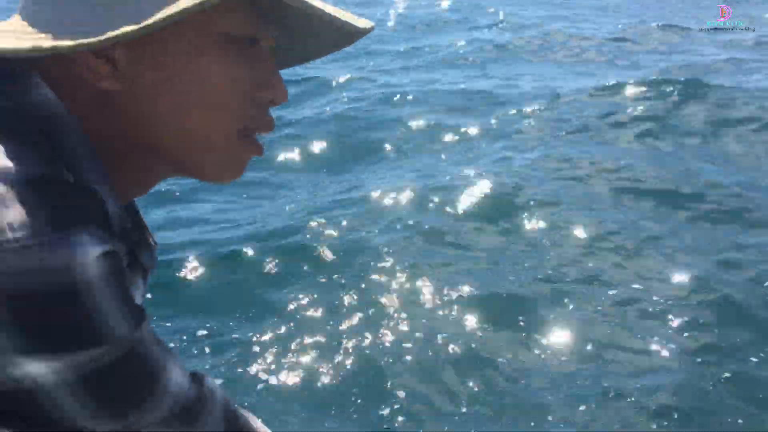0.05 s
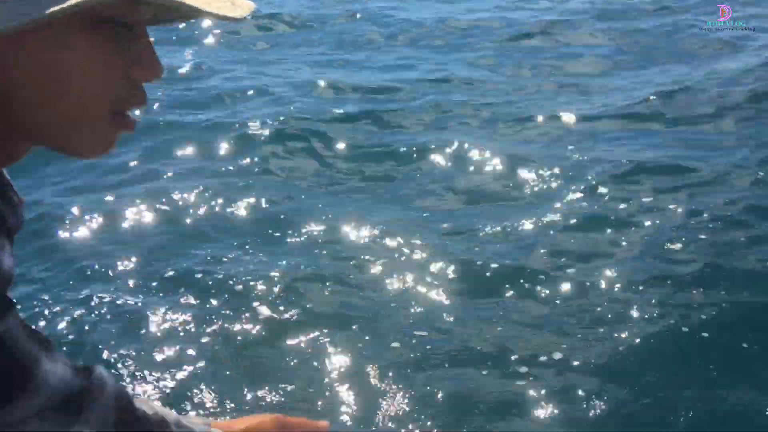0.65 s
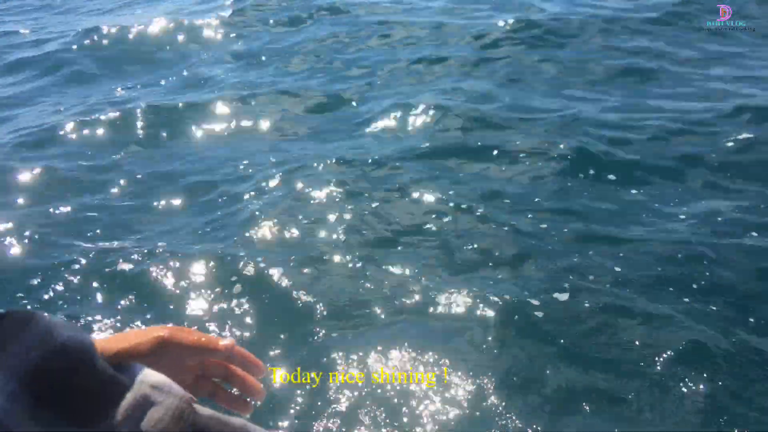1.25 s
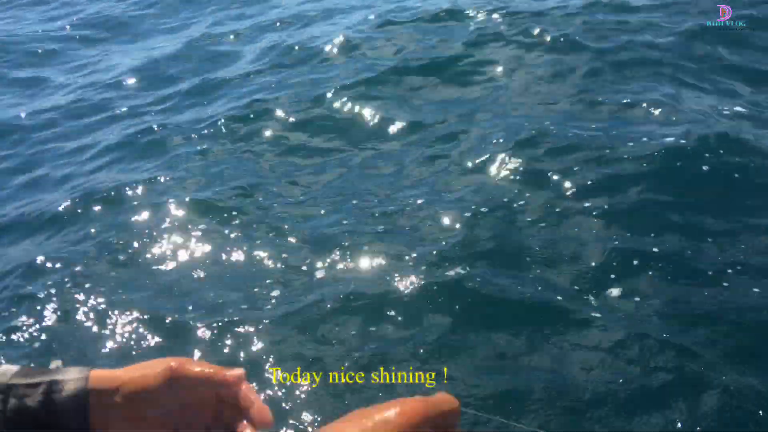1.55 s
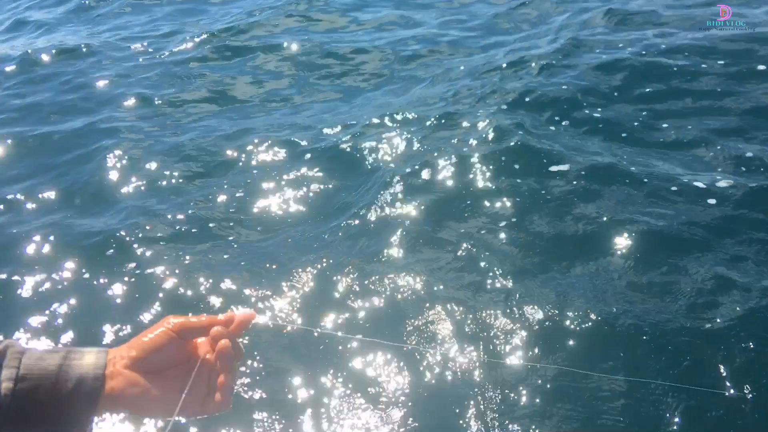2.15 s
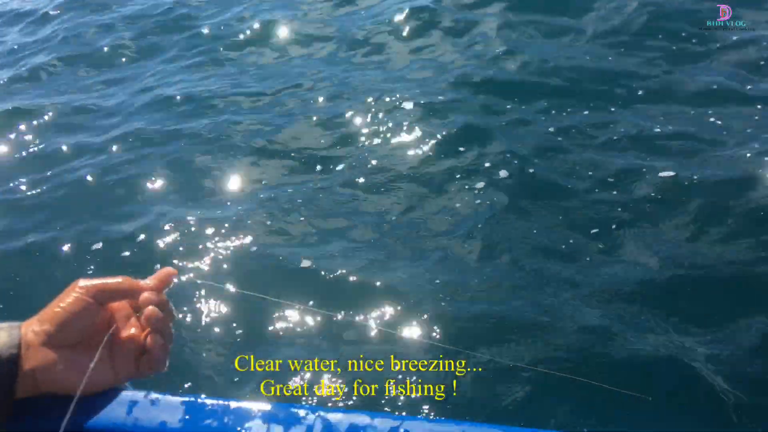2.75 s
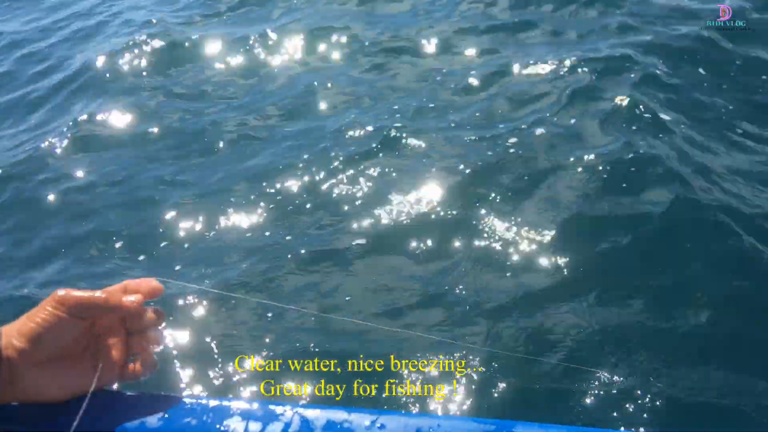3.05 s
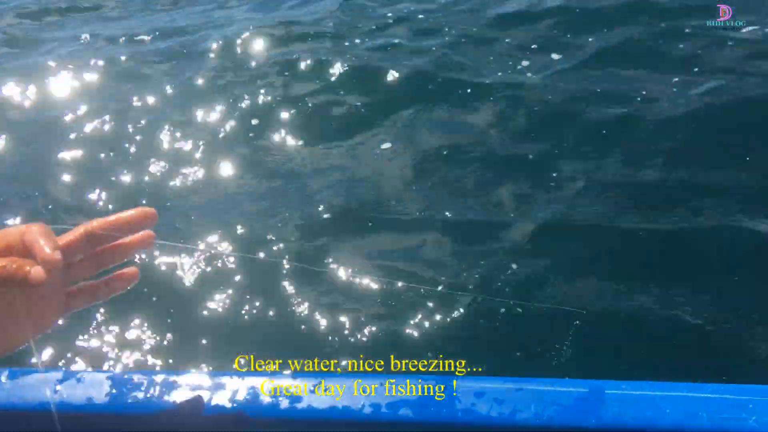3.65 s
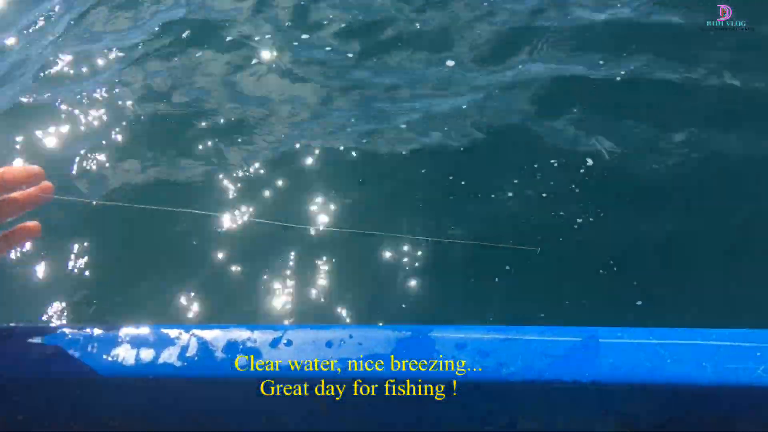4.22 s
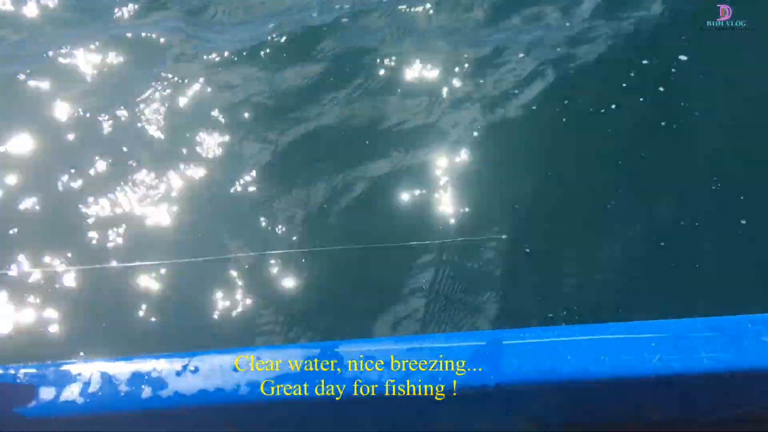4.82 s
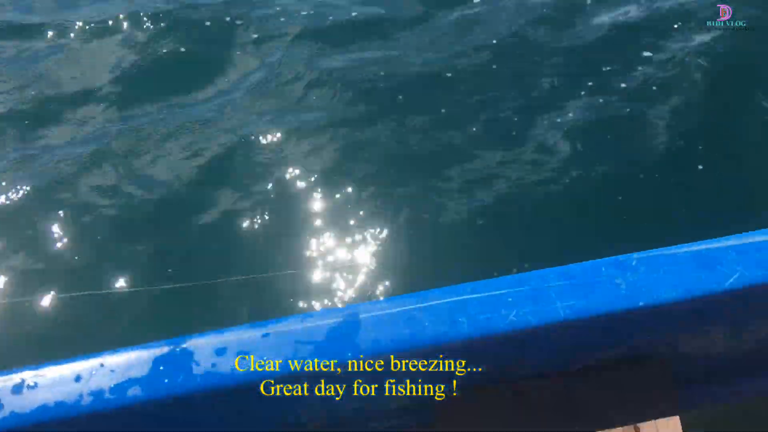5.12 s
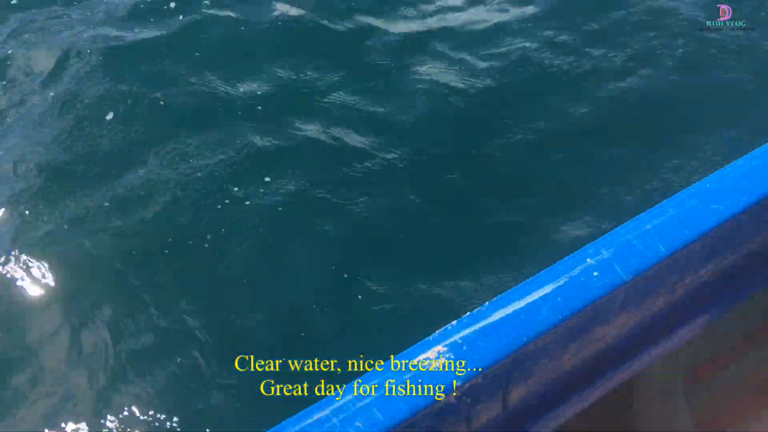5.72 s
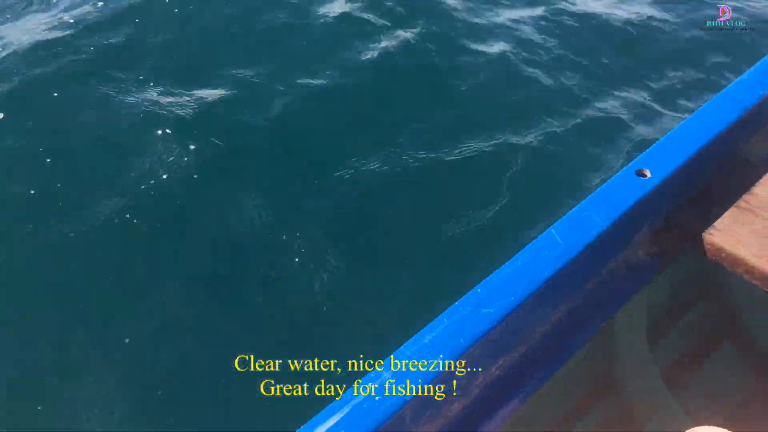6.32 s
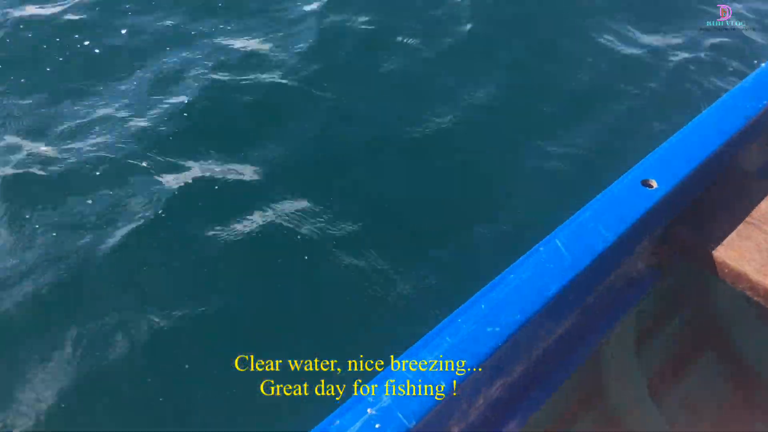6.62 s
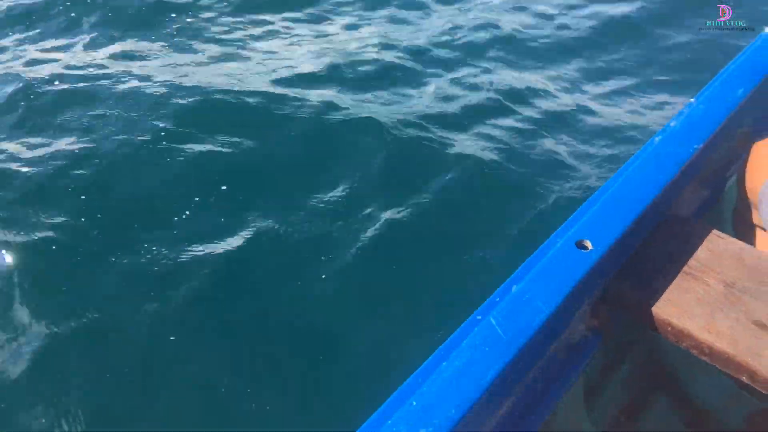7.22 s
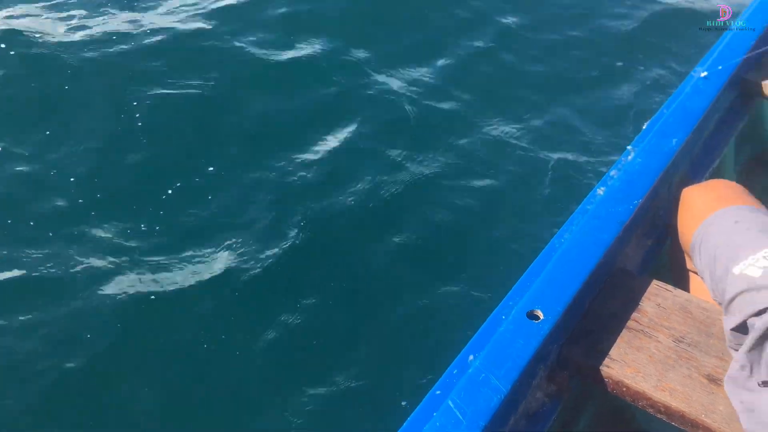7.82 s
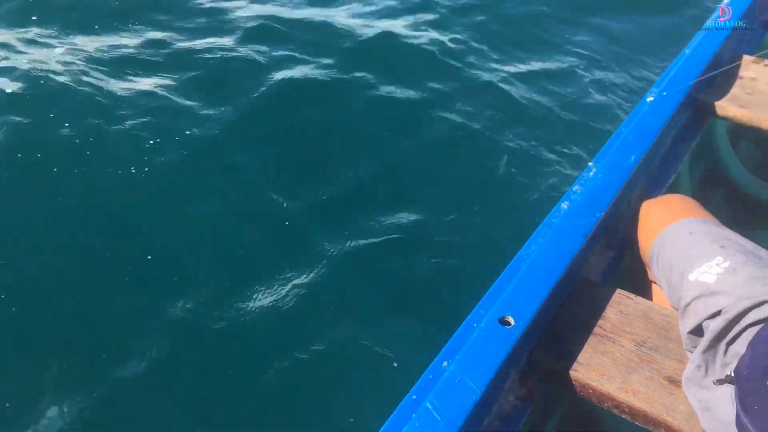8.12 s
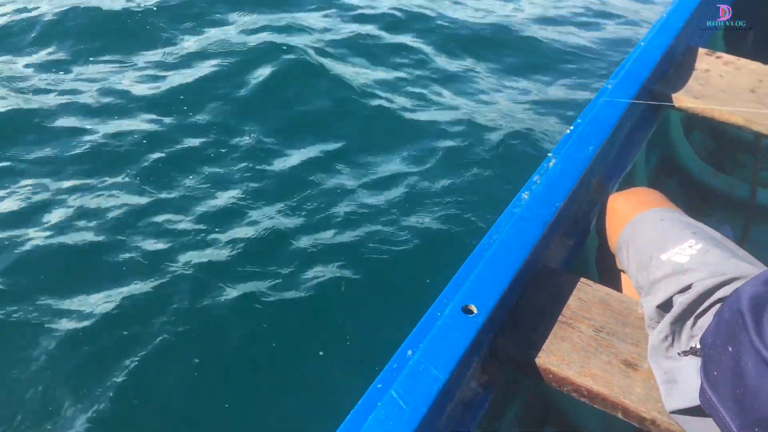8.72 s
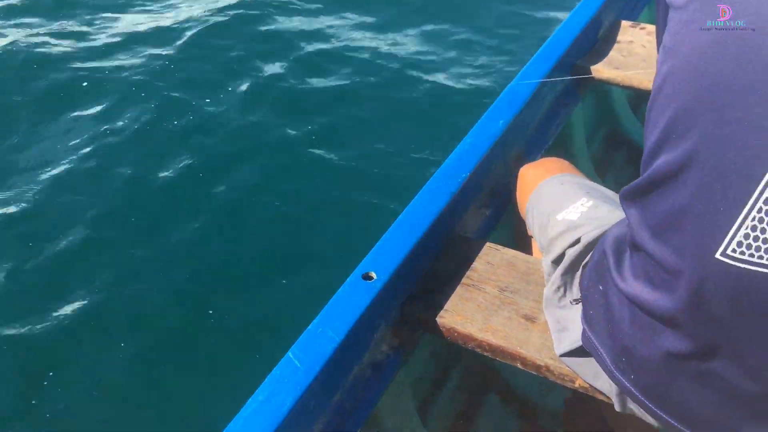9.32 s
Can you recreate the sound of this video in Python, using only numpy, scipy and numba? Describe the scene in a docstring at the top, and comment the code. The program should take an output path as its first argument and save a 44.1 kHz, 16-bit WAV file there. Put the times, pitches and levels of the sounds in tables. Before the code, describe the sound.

Choppy water gurgles and thumps against a wooden boat over a slowly idling engine and low wind rumble.

```python
"""A one-cylinder engine thuds slowly at idle, over rippling water and wind rumbling on a microphone.
It sits in a small wooden boat on a choppy sea. Wavelets lap at the side, trapping air that gulps
and plinks; foam fizzes, drops tick and clothing rustles twice. Later a few waves slap the planks
with a hollow thump, and the hardest slaps overload the microphone."""
import sys
import numpy as np
from scipy import signal
from scipy.fft import rfft, irfft, next_fast_len
from scipy.io import wavfile
from scipy.ndimage import uniform_filter1d
from numba import njit

SR = 44100
rng = np.random.default_rng(int(sys.argv[2]) if len(sys.argv) > 2 else 0)


def wav_out(sig):
    """Save sig, one row per channel (or a flat mono array), as 16-bit PCM at SR to the path in sys.argv[1]."""
    wavfile.write(sys.argv[1], SR, np.round(np.clip(np.atleast_2d(sig).T, -1, 1) * 32767).astype(np.int16))


N = 417186
TIME = np.arange(N) / SR
SHORT = TIME[:SR * 2 // 5]  # 0.4 s, the room for one short sound


def undb(db):
    """Turn decibels into a number to multiply by."""
    return 10 ** (np.asarray(db) / 20)


def curve(rows):
    """A volume that glides through rows of start_s, level_db."""
    return undb(np.interp(TIME, *np.transpose(rows)))


def add(out, start_s, sound):
    """Mix a sound in at a given time."""
    i = int(np.clip(start_s * SR, 0, N))
    out[i:i + len(sound)] += sound[:N - i]


def colour(x, points):
    """Shape the bass and treble of a sound by rows of pitch_hz, level_db."""
    size = next_fast_len(len(x))
    hz, db = np.transpose(points)
    bins_hz = np.maximum(np.arange(size // 2 + 1) * SR / size, .5)
    gain = undb(np.interp(np.log(bins_hz), np.log(hz), db))
    return irfft(rfft(x, size) * gain, size)[:len(x)]


def unit(x):
    """Scale a sound to an average strength of 1."""
    return x / np.std(x)


def burst(x):
    """Scale a sound so that its loudest 8 ms have a strength of 1."""
    return x / np.sqrt(uniform_filter1d(x * x, 350).max())


def wander(rate_hz):
    """A smooth random drift, about 1 either way."""
    hold = int(SR / rate_hz)
    steps = np.repeat(rng.standard_normal(N // hold + 1), hold)
    return unit(uniform_filter1d(steps, hold)[:N])


def fade(fade_s):
    """Die away by 60 dB in fade_s seconds."""
    return np.exp(-np.log(1000) * SHORT / fade_s)


def fade_in(rise_s):
    """Rise from silence, most of the way within rise_s seconds."""
    return 1 - np.exp(-SHORT / rise_s)


def ring(hz, fade_s):
    """One dying tone of a struck object."""
    return np.sin(2 * np.pi * hz * SHORT) * fade(fade_s)


def reflect(x, echo_db=0.5):
    """Water and planks throw a sound back and forth for a moment."""
    echoes = (rng.standard_normal(len(SHORT)) * fade(0.13) * fade_in(0.00037))[:SR // 8]
    return x + undb(echo_db) * signal.fftconvolve(x, echoes / np.linalg.norm(echoes))[:len(x)]


def wind():
    """Swirls of air push slowly on the microphone, harder in each gust."""
    # strength of the wind: start_s, level_db
    gusts = [(0.0, -28.5), (1.42, -24), (1.66, -22.5), (2.1, -25), (2.5, -27.5), (2.98, -14), (3.16, -18.5),
             (3.86, -19), (4.78, -27), (5.12, -17.5), (5.3, -23), (5.56, -13), (5.78, -13), (7.18, -21.5),
             (7.32, -25.5), (7.46, -22), (8.58, -20.5), (8.86, -16.5), (9.44, -13)]
    # tone of its rumble: pitch_hz, level_db
    rumble_tone = [(1, -28), (4, 1), (10, -8), (20, -11.5), (40, -21.5), (80, -27.5), (160, -45.5),
                   (400, -54.5), (2000, -99)]
    return undb(5.5) * curve(gusts) * unit(colour(rng.standard_normal(N), rumble_tone))


@njit
def bubbles(starts_s, hz, cycles, sizes, rise, samples):
    """Air bubbles ring and die away, climbing in pitch as they near the surface."""
    out = np.zeros(samples)
    for k in range(len(starts_s)):
        first, life, phase = int(starts_s[k] * SR), cycles[k] / hz[k] * SR, 0.
        for i in range(min(int(life), samples - first)):
            phase += 2 * np.pi * min(hz[k] * (1 + rise * i / life), .45 * SR) / SR
            swell = 1 - np.exp(-(phase / 4) ** 2)
            out[first + i] += sizes[k] * np.exp(-6.9 * i / life) * swell * np.sin(phase)
    return out


def patter(low_hz, high_hz, cycles, scatter_db, count):
    """Bubbles at random moments: many faint, a few strong."""
    when, pitch, size = rng.random((count, 3)).T
    hz = low_hz * (high_hz / low_hz) ** pitch
    sizes = undb(-scatter_db * np.log(np.maximum(size, .04))) * hz
    ringing = bubbles(when * N / SR, hz, np.full(count, cycles), sizes, rise=0.098, samples=N)
    return unit(reflect(ringing))


def splashlets(count):
    """Tiny crests collapse at random, each a short puff of hiss."""
    power = np.zeros(N)
    for when, size in rng.random((count, 2)):
        add(power, when * N / SR, undb(14 * size ** 3) ** 2 * fade(.045) * fade_in(.002))
    return unit(np.sqrt(power) * rng.standard_normal(N))


def ripples():
    """Ripples burble and splash in little groups over a faint wash."""
    # ripples around the boat: start_s, level_db
    levels = [(0.0, -39.5), (0.22, -34), (0.56, -40), (0.98, -44.5), (1.25, -38), (1.65, -41), (3.2, -42.5),
              (3.62, -37.5), (4.2, -42), (4.42, -36.5), (5.5, -45.5), (6.32, -46.5), (6.92, -41.5),
              (7.18, -38), (7.8, -39), (8.04, -31), (8.2, -42), (8.64, -37), (9.2, -48.5), (9.44, -41)]
    # tone of the water: pitch_hz, level_db
    water_tone = [(80, -20), (200, 11.5), (400, 7.5), (700, 4.5), (1000, -3), (1700, -8.5), (2600, -20),
                  (4000, -25), (7000, -39.5), (15000, -44.5)]
    groups = undb(2.1 * wander(rate_hz=12))
    burble = patter(260., 3600., cycles=20., scatter_db=2.9, count=2400)
    spatter = patter(2800., 14000., cycles=28., scatter_db=4.5, count=2200)
    lively = undb(-7) * burble + undb(-3) * spatter + undb(-12) * splashlets(count=160)
    wash = undb(-9.5) * rng.standard_normal(N)
    return undb(3.5) * curve(levels) * unit(colour(groups * lively + wash, water_tone))


def high_hiss():
    """High hiss and crackle: foam fizz, swelling twice with the rustle of clothing."""
    # strength of the hiss: start_s, level_db
    levels = [(0.0, -51.5), (0.6, -60), (1.28, -58), (1.56, -65.5), (2.3, -58), (2.46, -49.5), (3.2, -65.5),
              (4.12, -64.5), (4.48, -60), (5.42, -71), (6.38, -63), (6.66, -55.5), (7.0, -63.5),
              (8.06, -61.5), (9.04, -65.5), (9.18, -52), (9.44, -72)]
    # tone of the hiss: pitch_hz, level_db
    hiss_tone = [(500, 14.5), (2000, 13.5), (3500, 6), (5500, 0.5), (8500, -2), (11000, -8.5), (15500, -17)]
    crackle = .95 * patter(1830., 16000., cycles=16., scatter_db=4.8, count=2200)
    hiss = unit(colour(rng.standard_normal(N) + crackle, hiss_tone))
    return undb(5.5) * curve(levels) * hiss


def engine(idle_hz=10.165, first_firing_s=.0316):
    """Firing and exhaust thud, with lighter valve taps between; every stroke clacks the metal block."""
    # strokes of one cycle, timed from the firing: delay_s, pitch_hz, fade_s, thud_db, clack_db
    strokes = [(0, 98.8, 0.028, -8, -21.5), (0.028, 122.7, 0.22, -21.5, -23.5),
               (0.056, 102.6, 0.08, -21, -26.5), (0.088, 142, 0.078, -31, -28)]
    # tones of the engine block and mounts: pitch_hz, level_db, fade_s
    block_tones = [(175.6, 2.5, 0.089), (248.6, -14.5, 0.38), (380.5, -6, 0.093), (442.4, 3, 0.071),
                   (598, -2.5, 0.049)]
    out = np.zeros(N)
    block = np.array([undb(db) * ring(hz, fade_s) for hz, db, fade_s in block_tones])
    cycle_count = int(N / SR * idle_hz) + 1
    for delay_s, hz, fade_s, thud_db, clack_db in strokes:
        thud = -undb(thud_db) * ring(hz, fade_s) * fade_in(.002)
        for cycle, chance in enumerate(rng.standard_normal((cycle_count, len(block) + 2))):
            start_s = first_firing_s + cycle / idle_hz + delay_s + 0.00037 * chance[0]
            strength = undb(1.3 * chance[1])
            clack = -(1 + 0.89 * chance[2:]) @ block / 5
            clatter = undb(-35) * rng.standard_normal(len(SHORT)) * fade(0.14)
            add(out, start_s, strength * (thud + undb(clack_db) * (clack + clatter)))
    return signal.sosfilt(signal.butter(1, 4500, fs=SR, output="sos"), out)  # soften the treble


def cloud(hz, octaves, spread_s, cycles, count, rise=0.074, echo_db=2.0):
    """A handful of bubbles around one pitch swells and thins out; small, high ones are fainter."""
    pitch, size, life = rng.standard_normal((count, 3)).T
    starts_s = spread_s * rng.exponential(size=(count, 2)).mean(axis=1)
    starts_s -= starts_s.min()
    swell = (.3 + starts_s / spread_s) * np.exp(-starts_s / spread_s)
    sizes = undb(2.33 * size - 8.7 * octaves * pitch) * swell
    pitches_hz = hz * 2 ** (octaves * pitch)
    ringing = bubbles(starts_s, pitches_hz, cycles * np.exp(0.23 * life), sizes, rise, len(SHORT))
    return burst(reflect(ringing, echo_db))


def plinks():
    """Small bubbles ring out, bending upward, with a tiny splash as they pinch off."""
    # small bubbles: start_s, level_db, pitch_hz
    events = [(0.088, -38, 1900), (0.159, -26, 1720), (0.2484, -27.5, 1406), (0.374, -24.5, 1480),
              (0.666, -24.5, 1475), (0.835, -27, 955), (0.934, -37, 2800), (0.962, -38, 2220),
              (1.104, -32.5, 3430), (1.264, -31, 1720), (1.696, -32, 1100), (1.904, -32, 1320),
              (2.006, -31.5, 2160), (2.055, -23.5, 1105), (2.152, -40, 2380), (2.456, -28, 1560),
              (2.5462, -27, 1720), (2.78, -36, 2180), (3.058, -27.5, 1610), (3.072, -41, 3150),
              (3.275, -37, 2070), (3.288, -30.5, 1180), (3.331, -33.5, 1890), (3.612, -21.5, 1433),
              (3.891, -30.5, 1900), (4.343, -27.5, 1865), (4.419, -29, 1540), (4.486, -27, 1386),
              (4.525, -26, 1996), (4.618, -30, 994), (4.681, -28, 1825), (4.761, -23, 1270),
              (4.8487, -29, 2280), (4.993, -34, 2640), (5.088, -22.5, 970), (5.390, -34.5, 2330),
              (5.717, -25, 1825), (5.893, -30.5, 1420), (5.936, -24, 940), (6.086, -29, 985),
              (6.448, -29, 1593), (6.522, -22, 1420), (7.165, -23, 1100), (7.447, -24, 1070),
              (7.489, -28, 1020), (7.736, -34, 1800), (8.21, -27.5, 1290), (8.314, -30, 1720),
              (8.347, -20, 1290), (8.404, -34, 1943), (8.609, -37, 2760), (8.809, -37, 3100),
              (8.884, -26.5, 1280), (9.104, -28, 1695), (9.165, -22, 985)]
    out = np.zeros(N)
    for start_s, db, hz in events:
        plink = cloud(hz, octaves=.075, spread_s=.003, cycles=37., count=3, rise=.14, echo_db=-4.5)
        splash = undb(-8) * cloud(hz, octaves=.5, spread_s=.011, cycles=7., count=16)
        add(out, start_s, undb(db - 6.5) * (plink + splash))
    return out


def churn(swell_s):
    """Water torn too fine to ring makes a rush that swells and dies away."""
    tone = [(400, -23), (1500, 9.5), (2500, 9.5), (5000, -8), (15000, -28)]
    rush = colour(rng.standard_normal(len(SHORT)), tone)
    return burst(rush * SHORT * np.exp(-SHORT / swell_s))


def laps():
    """A wavelet folds over a pocket of air, which breaks into a gulp, a slosh and fine spray."""
    # wavelets at the side: start_s, level_db, pocket_pitch_hz, spray_db
    wavelets = [(0.156, -21, 298, -58), (0.188, -18.5, 640, -56), (0.31, -26, 530, -42),
                (0.348, -21, 295, -63), (0.695, -26, 696, -39.5), (0.723, -17, 693, -47.5),
                (0.919, -26, 338, -56), (1.249, -20, 638, -42.5), (1.92, -41, 571, -46),
                (1.99, -27, 587, -40), (2.787, -30, 660, -43), (2.832, -32, 727, -36),
                (2.910, -20, 339, -42.5), (3.087, -23, 309, -70), (3.526, -21.5, 274, -44),
                (3.613, -36, 684, -31.5), (3.637, -15.5, 370, -38.5), (3.661, -28, 735, -62),
                (3.814, -11, 635, -33), (4.04, -26, 748, -46.5), (4.3, -26, 619, -62),
                (4.354, -26, 464, -39), (4.37, -21, 840, -61), (4.732, -19, 445, -49),
                (4.748, -19.5, 597, -40), (4.963, -28, 325, -61), (5.029, -15, 333, -44.5),
                (5.089, -29.5, 602, -54), (5.221, -33, 605, -36), (5.237, -18.5, 745, -42),
                (5.36, -20, 329, -44), (5.649, -21, 303, -41), (5.68, -19, 315, -50),
                (5.928, -25, 320, -45.5), (6.223, -34, 554, -76), (6.527, -19.5, 698, -31.5),
                (6.571, -14.5, 762, -41.5), (7.084, -18, 355, -43), (7.151, -22, 349, -38),
                (7.203, -18.5, 319, -40), (7.228, -25.5, 730, -62), (7.342, -22, 421, -68),
                (7.366, -20, 570, -40), (7.481, -26.5, 640, -38.5), (7.563, -4, 479, -43),
                (7.899, -8.5, 740, -48), (7.958, -29, 603, -45), (8.012, -16.5, 515, -37.5),
                (8.105, -15, 320, -40), (8.133, -15, 587, -49), (8.205, -23, 616, -53),
                (8.258, -24, 280, -57), (8.322, -18.5, 518, -48), (8.501, -17.5, 581, -70),
                (8.687, -26.5, 716, -40), (8.717, -17, 262, -49), (8.885, -16, 295.4, -42.5),
                (9.157, -24, 533, -37.5), (9.188, -17.5, 559, -39.5), (9.389, -18.5, 507, -82)]
    out = np.zeros(N)
    for start_s, db, hz, spray_db in wavelets:
        gulp_db = db - 9.5 - 2.5 * np.log2(hz / 400)  # smaller, higher pockets gulp less
        slosh_db = db + 2 + 0.56 * (spray_db - db)  # grows with both pocket and spray
        pocket = undb(-4) * cloud(hz, .07, .007, 28., count=3, rise=.18, echo_db=-6)
        pocket += undb(-10.5) * cloud(424., .32, .015, 20.5, count=7, rise=.24)
        gulp = cloud(205., .293, .0155, 9.3, count=5)
        slosh = cloud(740., .3, .013, 17., count=12, rise=.16)
        spray = undb(1.5) * cloud(1800., .48, .021, 22., count=18, rise=.13, echo_db=-5)
        spray += undb(-3.5) * churn(swell_s=.007)
        mist = undb(-14.5) * cloud(4540., .655, .019, 22., count=26)
        body = undb(db) * pocket + undb(gulp_db) * gulp + undb(slosh_db) * slosh
        add(out, start_s, body + undb(spray_db) * (spray + mist))
        # thrown water lands again as a second, smaller splash
        landing_s = start_s + .028 * (.5 + rng.random())
        add(out, landing_s, undb(spray_db - 17) * cloud(2516., .62, .004, 22., count=10))
    return out


def drops():
    """A falling drop ticks softly on the surface and leaves a tiny crackle."""
    # drops landing nearby: start_s, level_db
    landings = [(0.156, -23), (0.656, -36), (0.672, -30), (0.919, -31), (1.108, -32), (2.334, -30.5),
                (2.5207, -34), (2.5469, -24), (2.77, -28.5), (3.614, -23), (3.8257, -31), (3.84, -29),
                (3.878, -28.5), (3.8935, -28.5), (4.277, -35), (4.4604, -36), (4.754, -30.5),
                (5.0553, -31.5), (5.2303, -30), (5.2659, -31), (6.087, -28.5), (6.415, -31.5), (6.839, -38),
                (6.922, -36), (7.1523, -37), (7.333, -29.5), (7.678, -38), (7.703, -39), (7.844, -35.5),
                (8.239, -39), (8.357, -30), (8.8456, -34), (8.874, -35)]
    tick_tone = [(800, -15), (3000, 0), (8000, -5), (15000, -14)]
    out = np.zeros(N)
    contact = fade(.012) * fade_in(.001)
    for start_s, db in landings:
        tick = colour(rng.standard_normal(len(SHORT)) * contact, tick_tone)
        crackle = cloud(5000., octaves=.5, spread_s=.01, cycles=30., count=12, echo_db=-4)
        add(out, start_s, undb(db - 18) * (burst(reflect(tick, echo_db=-3)) + crackle))
    return out


def heaves():
    """Big air pockets squeezed under the boat give a dull, low wobble."""
    # waves heaving underneath: start_s, level_db, pitch_hz
    swells = [(0.359, -17.5, 79.5), (4.361, -13.5, 95.4), (7.188, -14, 152), (7.732, -16.5, 139.7)]
    out = np.zeros(N)
    for start_s, db, hz in swells:
        add(out, start_s, undb(db) * cloud(hz, octaves=.22, spread_s=.0287, cycles=4.4, count=5))
    return out


def swishes():
    """Cloth slides over cloth: a bright rustle that swells and stops."""
    # clothing brushing past: start_s, length_s, level_db
    brushes = [(2.318, 0.41, -61), (9.184, 0.13, -41.5)]
    cloth_tone = [(400, -9), (1500, 8), (5000, -2), (9000, -7), (15000, -13)]
    out = np.zeros(N)
    for start_s, length_s, db in brushes:
        swell = np.sin(np.pi * np.clip((TIME - start_s) / length_s, 0, 1))
        out += undb(db) * swell * rng.standard_normal(N)
    return unit(colour(out, cloth_tone)) * np.std(out)


def slaps(thump_hz=285, swell_s=.002):
    """A wave hits the boat flat: trapped air thumps and breaks up, planks ring and water bursts out."""
    # slaps on the planks: start_s, level_db, splash_db
    hits = [(3.8194, -19.5, -3), (7.5497, 2, -2.5), (7.8923, 2, -5), (8.1232, -6, -4), (8.718, -19.5, -1),
            (8.8724, -17.5, -5.5), (9.046, -21.5, -3)]
    # tones of the planks: pitch_hz, level_db, fade_s
    planks = [(95.5, -7, 0.45), (150.1, -7, 0.29), (224, -2.5, 0.1), (262, 3, 0.096), (321.5, -2.5, 0.13),
              (437, -5, 0.071), (728, 2, 0.073)]
    # tone of the bursting spray: pitch_hz, level_db
    splash_tone = [(60, -6), (250, 0), (650, 7.5), (1080, -3.5), (1480, -0.5), (2500, -16.5), (4000, -24),
                   (8000, -37), (15000, -46)]
    out = np.zeros(N)
    swell = SHORT / swell_s * np.exp(1 - SHORT / swell_s)
    thump = np.sin(2 * np.pi * thump_hz * SHORT) * swell
    for start_s, db, splash_db in hits:
        # each slap lands elsewhere, and water lying on the planks shifts their tones
        weights = undb(rng.standard_normal(len(planks))) * (-1) ** np.arange(len(planks))
        shifts = 1 + .03 * rng.standard_normal(len(planks))
        tones = np.array([undb(tone_db) * ring(hz * shift, fade_s)
                          for (hz, tone_db, fade_s), shift in zip(planks, shifts)])
        boom = undb(-1) * thump - undb(-6.5) * burst(weights @ tones)
        splash = colour(rng.standard_normal(len(SHORT)), splash_tone) * fade(0.075)
        air = cloud(680., octaves=.5, spread_s=.008, cycles=12., count=44, rise=.25, echo_db=-14)
        slap = boom + undb(-8) * air + undb(splash_db) * burst(splash)
        add(out, start_s, undb(db) * fade_in(.0007) * slap)
    return out


def scene():
    """Everything as heard from inside the boat, in the open air."""
    water = laps() + heaves() + plinks() + drops() + slaps() + ripples()
    return (water + high_hiss() + engine() + swishes() + wind())[None]


def record(dry):
    """The overloaded microphone flattens the loudest peaks; treble above 15600 Hz is cut."""
    clipped = dry / (1 + dry ** 8) ** (1 / 8)
    return signal.sosfilt(signal.ellip(8, .2, 70, 15600, fs=SR, output="sos"), clipped)


dry = scene()
out = record(dry)
wav_out(out)
```